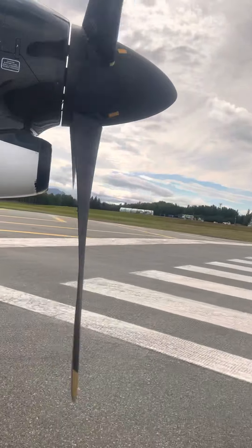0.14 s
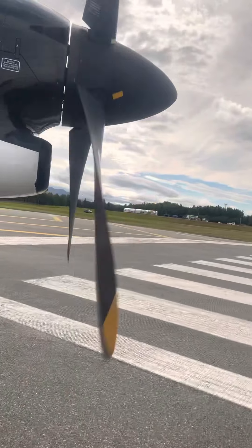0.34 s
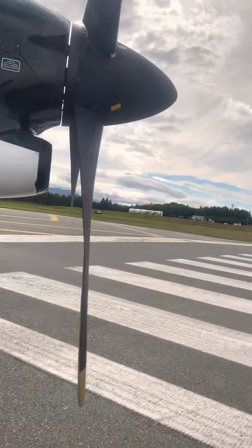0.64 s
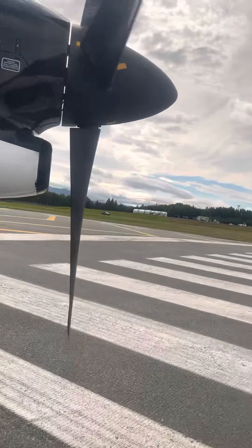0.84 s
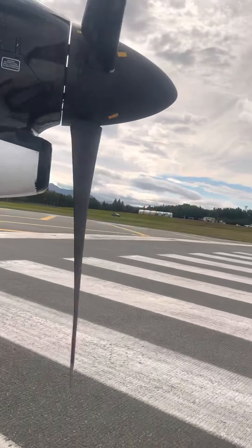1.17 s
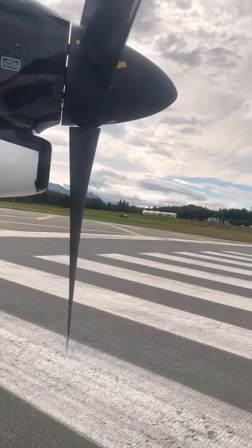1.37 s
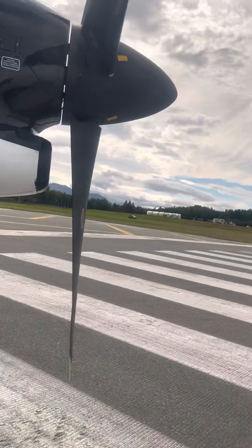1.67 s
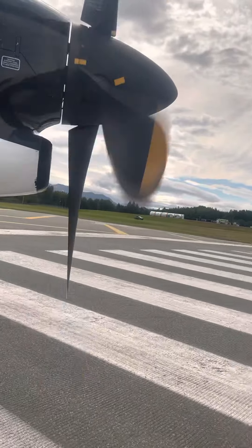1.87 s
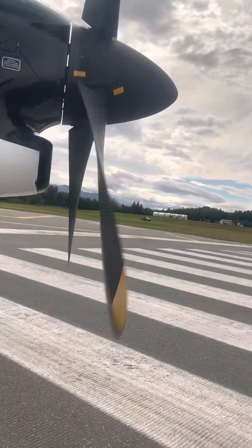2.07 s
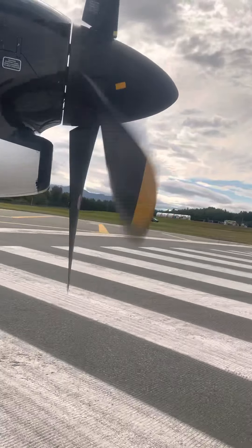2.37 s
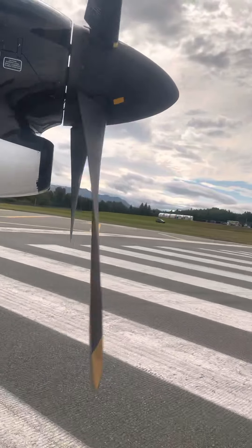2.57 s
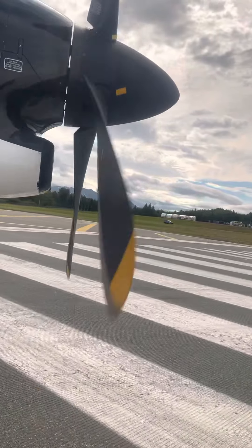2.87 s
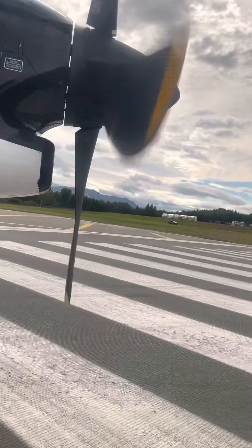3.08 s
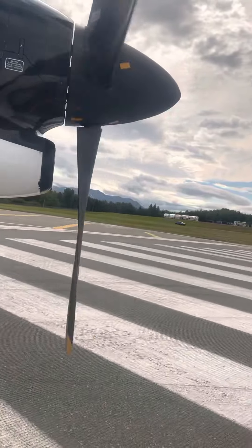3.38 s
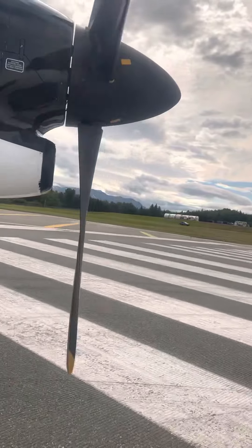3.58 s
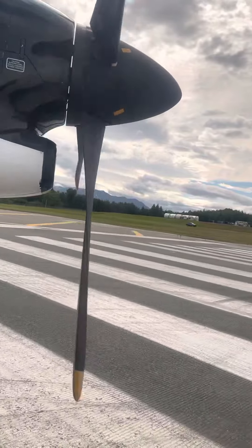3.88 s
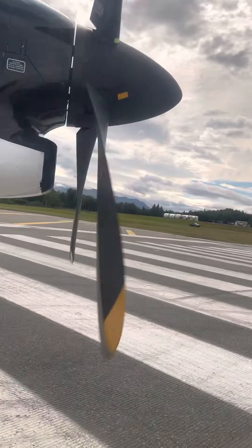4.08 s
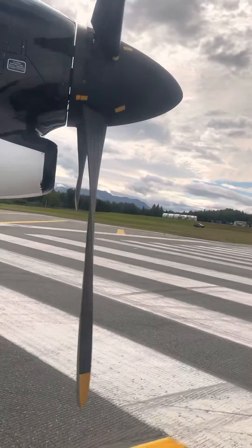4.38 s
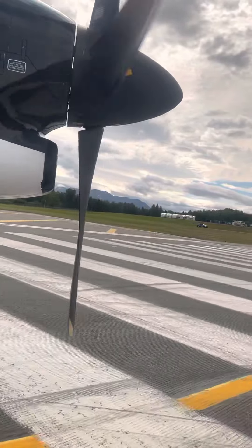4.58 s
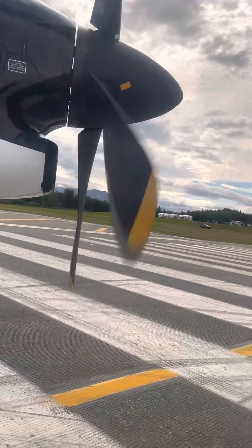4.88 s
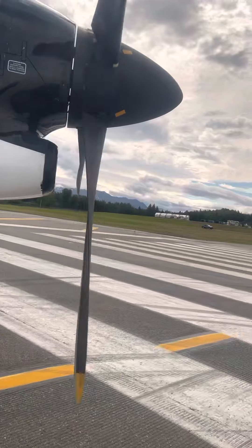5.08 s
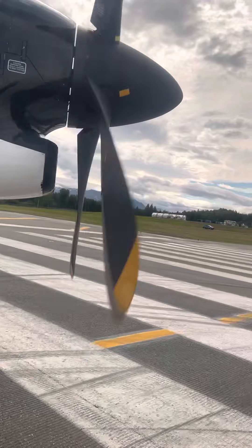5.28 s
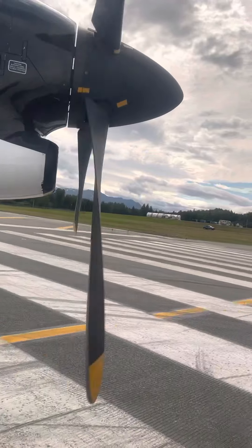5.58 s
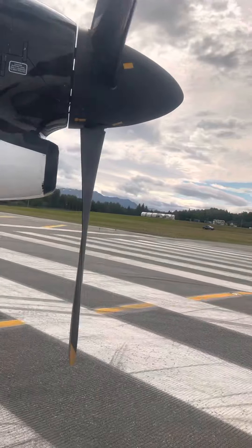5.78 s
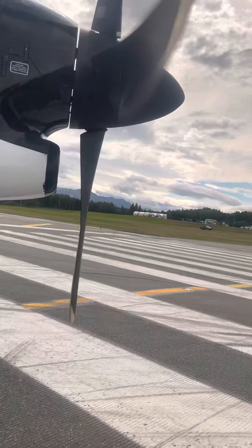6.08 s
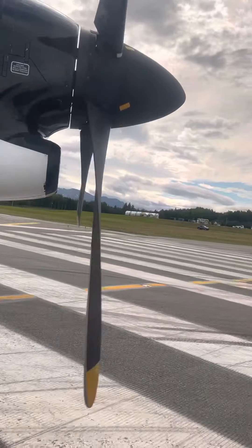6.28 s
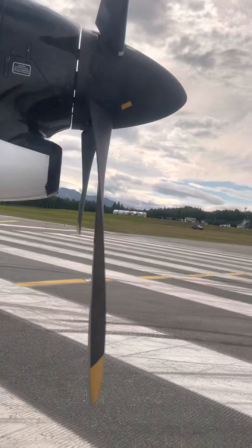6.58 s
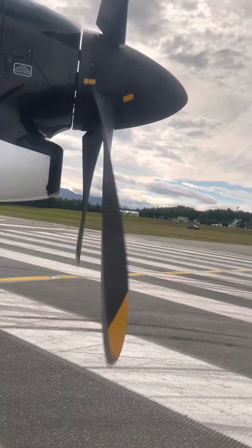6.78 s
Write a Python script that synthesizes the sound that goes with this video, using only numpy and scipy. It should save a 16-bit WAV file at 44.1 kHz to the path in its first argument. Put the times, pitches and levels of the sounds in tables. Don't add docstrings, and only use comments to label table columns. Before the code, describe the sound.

Heard from a window seat in a twin turboprop taxiing over tarmac, a loud bass propeller drone throbs through the wall. The roar drops at about one second, then jumps up suddenly just before three seconds and slowly settles. Airframe hums, low rumble, soft cabin hiss and a very faint high compressor whine continue throughout. The close microphone gives mostly bass, nearly centred, with wider treble.

```python
import sys
import numpy as np
from scipy import signal
from scipy.fft import rfft, irfft, next_fast_len
from scipy.io import wavfile
from scipy.ndimage import uniform_filter1d, minimum_filter1d, map_coordinates

SR = 44100
rng = np.random.default_rng(int(sys.argv[2]) if len(sys.argv) > 2 else 0)


def waveform_to_disk(signal):
    frames = np.transpose(np.atleast_2d(signal))
    scaled = np.clip(frames, -1, 1) * 32767
    samples = np.round(scaled).astype(np.int16)
    wavfile.write(sys.argv[1], SR, samples)


def nominal_scale(level):
    x = np.asarray(level, float) / 20
    return 10 ** x


N = 306054

# time in s, blade passing rate in Hz, roar level in dB.
BLADE_LOAD = [(0, 52.8, -29.5), (.45, 53.1, -29.5), (.88, 52.8, -30), (.98, 52.4, -33.5), (1.6, 51.7, -35),
              (2.4, 52.1, -35), (2.7, 52.5, -33), (2.79, 52.8, -23), (2.88, 52.7, -25), (3.05, 52.7, -24.5),
              (3.5, 53.5, -24), (4.1, 53.3, -25.5), (4.7, 53.7, -27), (5.5, 53.2, -27.3),
              (6.2, 53.4, -27.5), (6.94, 53, -28.5)]
# time in s, near whine in Hz, far whine in Hz.
COMPRESSOR_SPEED = [(0, 8922, 8786), (1.15, 8922, 8788), (1.45, 8955, 8870), (1.9, 9090, 9020),
                    (2.4, 9250, 9190), (2.8, 9290, 9180), (3.3, 9250, 9090), (3.8, 9140, 9020),
                    (4.5, 9020, 8900), (5, 8950, 8810), (5.5, 8925, 8778), (6.94, 8900, 8742)]


def evened(x):
    return x / np.sqrt(np.mean(x ** 2) + 1e-20)


def read(points, hz):
    f, value = np.transpose(points)
    return np.interp(np.log(hz + 1), np.log(f + 1), value)


def curves(rows):
    s, *columns = np.transpose(rows)
    return [np.interp(np.arange(N) / SR, s, column) for column in columns]


def slow(hz):
    step = 64
    count = N // step + 2
    f = np.fft.fftfreq(4800, step / SR)
    spectrum = rng.standard_normal(len(f)) + 1j * rng.standard_normal(len(f))
    z = np.fft.ifft(spectrum / (1 + (2 * f / hz) ** 2))[:count]
    z = z / np.sqrt(np.mean(abs(z) ** 2))
    return np.interp(np.arange(N) / step, np.arange(count), z)


def wander(count, per_s):
    knots = rng.standard_normal(64)
    return map_coordinates(knots, [np.arange(count) * per_s / SR + 2], order=1)


def tone(hz, shape=1):
    phase = np.cumsum(hz) / SR + rng.random()
    z = shape * np.exp(2j * np.pi * phase)
    return np.sqrt(2) * np.array([z.real, z.imag])


def noise(spectrum, patchy_db, extra_db=0):
    hz = np.fft.rfftfreq(2048, 1 / SR)
    real, imag, patches = rng.standard_normal((3, 2, len(hz), N // 512 + 5))
    patches = uniform_filter1d(patches[0], size=14, axis=0)
    patches = evened(uniform_filter1d(patches, size=8, axis=1))
    colour = nominal_scale(read(spectrum, hz) + extra_db)[:, None]
    z = (real + 1j * imag) * colour * nominal_scale(patchy_db * patches)
    return evened(signal.istft(z, nperseg=2048, noverlap=1536)[1][:, :N])


def power():
    idle_hz, full_hz = 8922, 9290
    return np.clip((curves(COMPRESSOR_SPEED)[0] - idle_hz) / (full_hz - idle_hz), 0, 1)


def propeller():
    # multiple, level in dB, share of the load change, wander in dB.
    low_beats = [
        (1, -21.5, -0.6, 1),
        (2, -20, .4, 2),
    ]
    # multiple, level in dB, blur in Hz, share of the load change.
    blurred_overtones = [(3, -17.5, 14, 0.99), (4, -20, 10, 1.28), (5, -24, 13, 1.29), (6, -28.5, 22, 1.33),
                         (7, -27, 13, 0.77), (8, -36, 8.3, 1.4), (9, -36.5, 25, 1.6), (10, -42.5, 13, 0.56),
                         (11, -44.5, 18, 1.8), (12, -42.5, 19, 1.3), (13, -40.5, 22, 0.74),
                         (14, -51, 8.7, 1.1), (15, -42.5, 47, 0.76), (16, -51.5, 7.3, 0.57)]
    # time in s, length in s, depth in dB.
    cancellations = [
        (.5, 0.24, -18),
        (3.15, 0.38, -3.5),
        (4.2, 0.51, -8),
        (6.5, .3, -4),
    ]
    # frequency in Hz, level in dB per Hz.
    roar_spectrum = [(100, -19), (170, 2), (230, -1.5), (300, -2.5), (400, -5), (460, -13), (640, -12.5),
                     (800, -14.5), (1000, -21.5), (1150, -22.5), (1300, -31), (1600, -36.5), (2200, -43),
                     (4000, -74)]
    loaded_db, tone_lag_s = -27, .12
    t = np.arange(N) / SR
    hz, roar_db = curves(BLADE_LOAD)
    load_db = roar_db - loaded_db
    late_db = np.minimum(load_db, np.interp(t - tone_lag_s, t, load_db))
    rough = np.clip(.92 + load_db * .025, 0, .97)
    turns = np.cumsum(hz) / SR
    skew = np.cumsum(hz * .011 * np.clip(1 + load_db / 8, 0, 1)) / SR
    cancel_db = sum(db * np.exp(-(2 * (t - s) / length) ** 2) for s, length, db in cancellations)
    out = np.zeros((2, N))
    for k, db, share, wander_db in low_beats:
        level_db = db + share * load_db + wander_db * wander(N, per_s=4.3) + cancel_db * (k == 1)
        out += nominal_scale(level_db) * tone(k * hz)
    for k, db, blur_hz, share in blurred_overtones:
        steady = np.sqrt(1 - rough ** 2)
        smeared = rough * slow(blur_hz) * np.exp(2j * np.pi * k * skew)
        out += nominal_scale(db + share * late_db) * tone(k * hz, steady + smeared)
    chop = 1 + .08 * np.cos(2 * np.pi * turns)
    return out + nominal_scale(load_db - 20.0) * chop * noise(roar_spectrum, patchy_db=0.94)


def hums():
    # start in s, end in s, start pitch in Hz, end pitch in Hz, level in dB.
    machine_tones = [(-.2, .5, 67.7, 66.2, -25), (.7, 3.15, 66.4, 65.4, -22), (3.3, 4.3, 65.2, 67.2, -26),
                     (4.6, 7.1, 67.4, 66.5, -27), (-.2, .52, 152.5, 150, -16), (1.1, 2.9, 148.5, 140, -20),
                     (-.2, .65, 137.5, 135.5, -19.5), (.7, 1.1, 134.5, 134, -22),
                     (1.3, 2.5, 134.5, 130.5, -25), (.95, 2.15, 97.6, 93.5, -25),
                     (2.8, 5.15, 90.5, 84.5, -19), (5.4, 6.1, 86.5, 90.5, -17), (6.15, 7.1, 93, 98.5, -27),
                     (4.1, 7.1, 144.5, 143.5, -26), (-.2, .9, 580, 576, -45), (1.05, 1.55, 572, 570, -42),
                     (2.1, 2.78, 570, 576, -41), (-.2, .9, 678, 677, -39.5)]
    fade_s, wander_db = .2, 1.8
    out = np.zeros((2, N))
    for start, end, start_hz, end_hz, db in machine_tones:
        span_s = np.array([start - fade_s / 2, end + fade_s / 2])
        first, last = np.clip(np.round(span_s * SR).astype(int), 0, N)
        t = np.arange(first, last) / SR
        alive = np.clip(np.minimum(t - start, end - t) / fade_s + .5, 0, 1)
        level = alive * nominal_scale(db + wander_db * wander(len(t), per_s=3.2))
        out[:, first:last] += level * tone(np.interp(t, [start, end], [start_hz, end_hz]))
    return out


def compressors():
    whine_db, whine_loss_db, whine_mask_db = [-67.5, -68], -1.5, -4
    sideband_hz, sideband_db = -55, -8
    waver_hz, waver_loaded_hz, bite_s = 1.5, 13, 2.6
    gear_ratio, gear_slip = .4971, .0028
    gears_db, gear_loss_db = [-66, -62], -13
    gears_after_db, gear_load_share = [-7, -7.5], .8
    raised = np.clip(8 * power(), 0, 1)
    slack_db = np.minimum(curves(BLADE_LOAD)[1] - BLADE_LOAD[0][2], 0)
    loaded = np.clip((np.arange(N) / SR - bite_s) / .3, 0, 1)
    waver_width_hz = waver_hz * (1 + 2 * raised) + waver_loaded_hz * loaded * (1 + raised) / 2
    out = np.zeros((2, N))
    for hz, db, gear_db, after_db in zip(curves(COMPRESSOR_SPEED), whine_db, gears_db, gears_after_db):
        db = db + whine_loss_db * raised + whine_mask_db * loaded
        waver = waver_width_hz * slow(14).real
        out += nominal_scale(db) * tone(hz + waver, 1 + .4 * slow(22))
        out += nominal_scale(db + sideband_db) * tone(hz + waver + sideband_hz, 1 + .4 * slow(22))
        gear_db = gear_db + gear_loss_db * raised + after_db * loaded + gear_load_share * slack_db
        gear_hz = (gear_ratio + gear_slip * loaded) * hz + waver / 2
        out += nominal_scale(gear_db) * tone(gear_hz, 1 + .45 * slow(12))
    return out


def whistles():
    # start in s, length in s, edge pitch in Hz, top pitch in Hz, level in dB.
    pitch_arches = [
        (.69, .2, 11900, 12300, -63),
        (2.67, .3, 11800, 15600, -58.5),
    ]
    out = np.zeros((2, N))
    for s, length, edge_hz, top_hz, db in pitch_arches:
        u = np.arange(round(length * SR)) / (length * SR)
        hz = edge_hz + (top_hz - edge_hz) * np.sin(np.pi * u ** .65)
        fade = np.clip(6 * np.minimum(u, 1 - u), 0, 1)
        out[:, round(s * SR):][:, :len(u)] += nominal_scale(db) * fade * tone(hz)
    return out


def ticks():
    # time in s, level in dB, 60 dB decay time in s.
    trim_snaps = [
        (2.853, -45, .04),
        (5.49, -31, .01),
    ]
    out, t = np.zeros((2, N)), np.arange(2000) / SR
    for s, db, t60 in trim_snaps:
        bright = np.diff(rng.standard_normal((2, 2001)))
        out[:, round(s * SR):][:, :len(t)] += nominal_scale(db - 60 * t / t60) * bright
    return out


def cabin():
    # frequency in Hz, level in dB per Hz.
    rumble_spectrum = [(40, -10), (47, -4), (53, 3.5), (80, 1.5), (150, -4.5), (180, -4.5), (230, -17.5),
                       (350, -20.5), (450, -36.5), (800, -38.5), (1500, -57)]
    # frequency in Hz, level in dB per Hz.
    hiss_spectrum = [(400, -11), (900, 1.5), (1420, 0.5), (2200, 0.94), (2400, -6.5), (3100, -6.5),
                     (3600, -11.5), (4900, -16), (6400, -16.5), (8000, -23.5), (11000, -19), (12500, -27.5),
                     (14000, -31), (16000, -39)]
    # frequency in Hz, width in Hz, gain in dB.
    panel_modes = [(2120, 66, 2), (2253, 65, 5), (2710, 33, 3), (3030, 120, 3.5), (3350, 89, -5.5),
                   (3440, 50, 3), (4440, 250, 0.5), (4800, 200, -4.5), (1190, 30, 5)]
    lag_s = 0.14
    hz, t = np.fft.rfftfreq(2048, 1 / SR), np.arange(N) / SR
    wall_db = sum(db / (1 + (2 * (hz - f) / width) ** 2) for f, width, db in panel_modes)
    rumble_db = -19 + 2.5 * wander(N, per_s=5)
    rumble = nominal_scale(rumble_db) * noise(rumble_spectrum, patchy_db=1.15)
    hiss_db = -41 + 2.5 * np.interp(t - lag_s, t, power()) ** 2
    return rumble + nominal_scale(hiss_db) * noise(hiss_spectrum, patchy_db=0.86, extra_db=wall_db)


def scene():
    return propeller() + hums() + compressors() + whistles() + ticks() + cabin()


def top_cut(x):
    return signal.sosfilt(signal.butter(12, 15710, fs=SR, output="sos"), x)


def record(dry):
    # frequency in Hz, level in dB.
    difference_db = [(60, -38.5), (92, -27), (140, -17), (210, -17), (330, -11.5), (500, 0), (700, -4.5),
                     (1170, -3), (1790, -12), (2600, -5), (5000, 2.5), (5700, -5), (9000, 4), (11500, 1),
                     (13000, -6), (13700, -14), (14100, -41.5)]
    # frequency in Hz, share -1 to 1.
    tilt_share = [(60, 0.66), (330, .8), (500, 0.38), (1170, 0.6), (1790, 0), (2740, -.1), (4190, -.1),
                  (9000, 0)]
    # frequency in Hz, level in dB.
    port_sum_db = [(7000, 1), (8000, -1), (8500, -6), (9000, -2.5), (9400, -19), (10900, -14), (11400, -11),
                   (11800, -2), (14500, -8), (16000, -14)]
    # frequency in Hz, share -1 to 1.
    delay_share = [(400, 0.32), (1000, -.5), (1600, 0), (2400, .5), (4000, .4), (5000, 0)]
    margin = 4096
    wide = np.pad(dry, ((0, 0), (margin, margin)), "reflect", reflect_type="odd")
    size = next_fast_len(wide.shape[1])
    hz = np.fft.rfftfreq(size, 1 / SR)
    first, second = rfft(wide, size) / np.sqrt(1 + (46 / (hz + 1e-3)) ** 8)
    lean, lead = np.clip(read(tilt_share, hz), -1, 1), read(delay_share, hz)
    apart = np.sqrt(np.clip(1 - lean ** 2 - lead ** 2, 0, 1))
    side = nominal_scale(read(difference_db, hz)) * ((lean + 1j * lead) * first + apart * second)
    both = nominal_scale(read(port_sum_db, hz)) * first
    pair = irfft(np.array([both + side, both - side]), size)[:, margin:margin + N]
    room = np.minimum(.94 / (abs(pair).max(0) + 1e-9), 1)
    room = minimum_filter1d(room, size=1401)
    gain = uniform_filter1d(uniform_filter1d(room, size=700), size=700)
    bass = signal.oaconvolve(pair, signal.firwin(255, 900, fs=SR)[None], "same")
    return top_cut(pair + (gain - 1) * bass)


dry = scene()
out = record(dry)
waveform_to_disk(out)
```